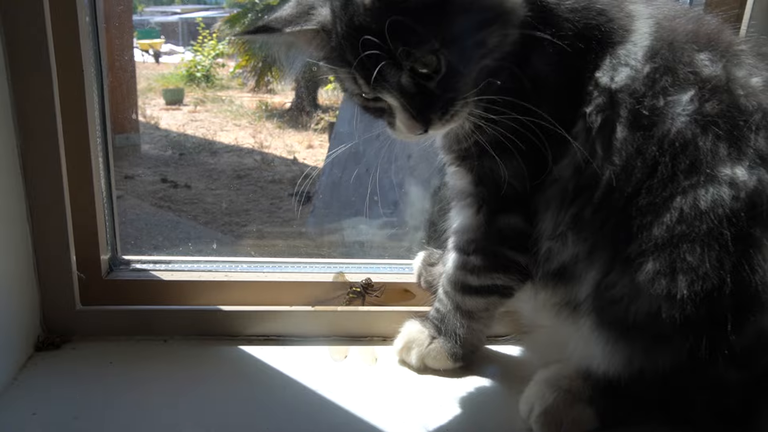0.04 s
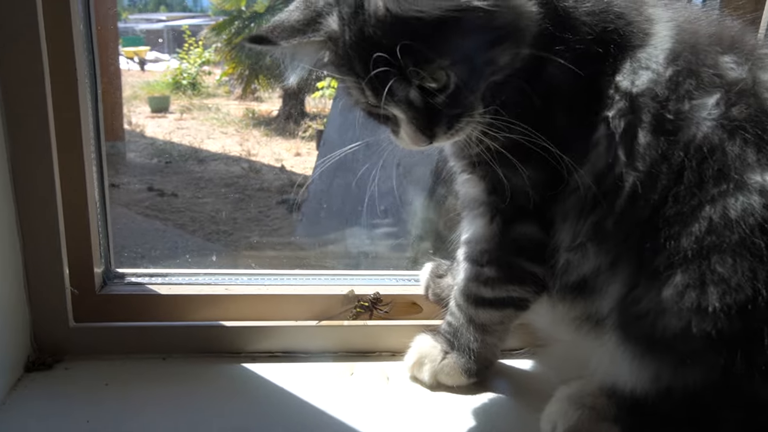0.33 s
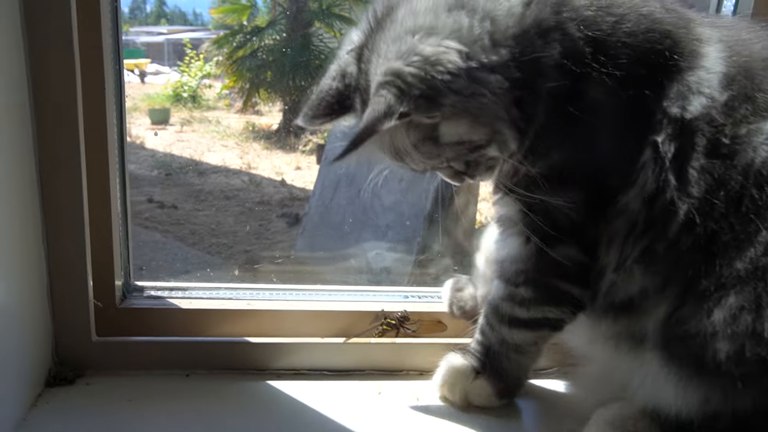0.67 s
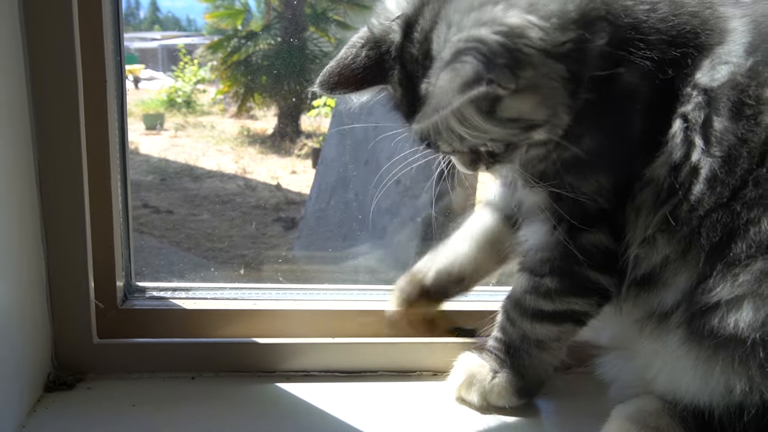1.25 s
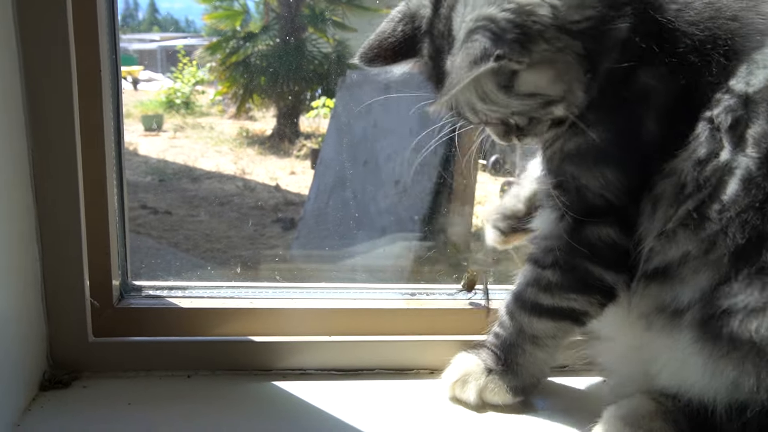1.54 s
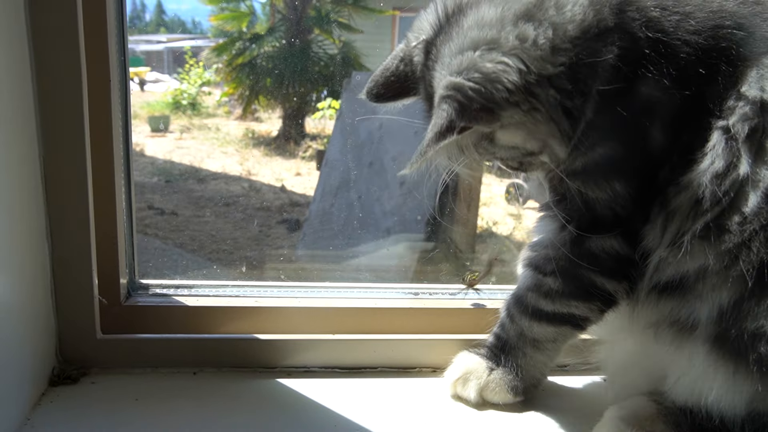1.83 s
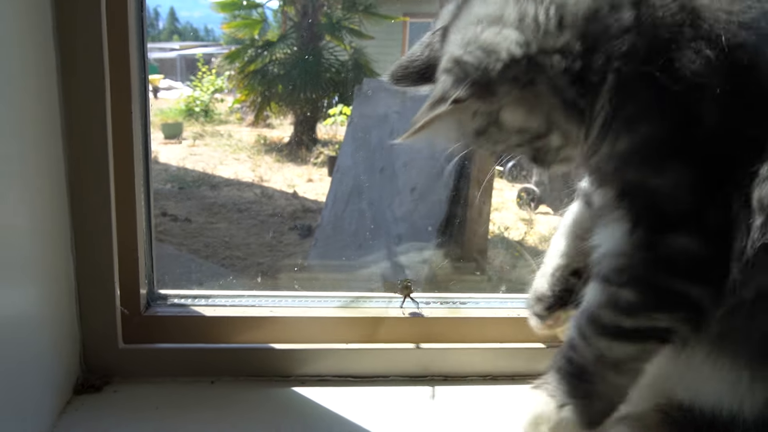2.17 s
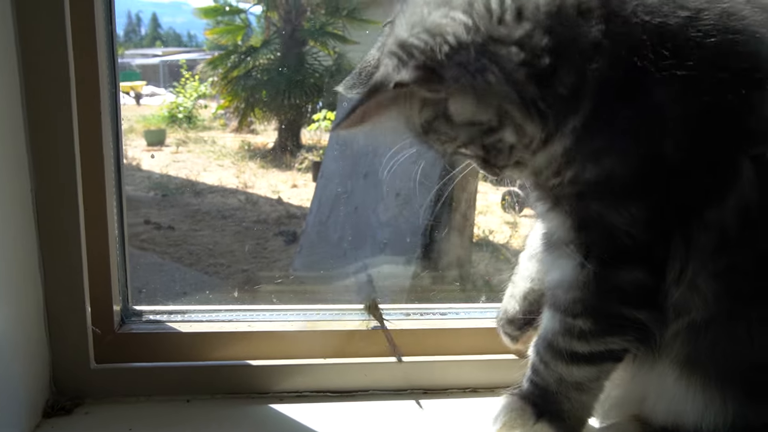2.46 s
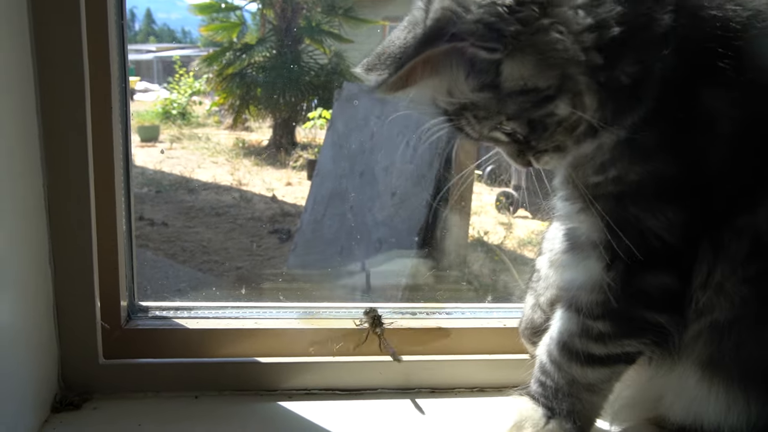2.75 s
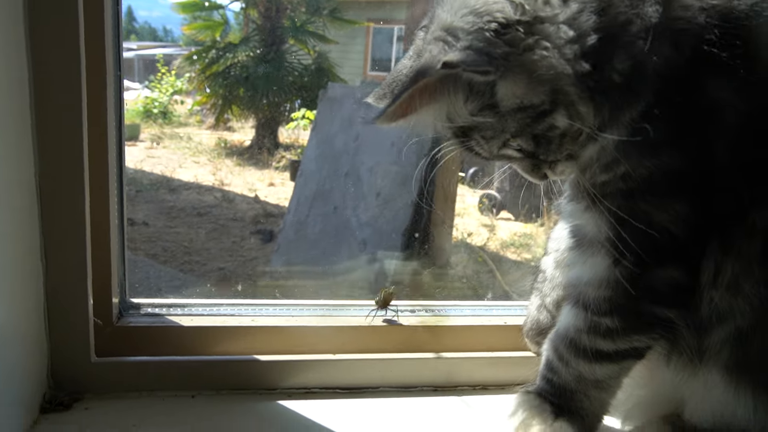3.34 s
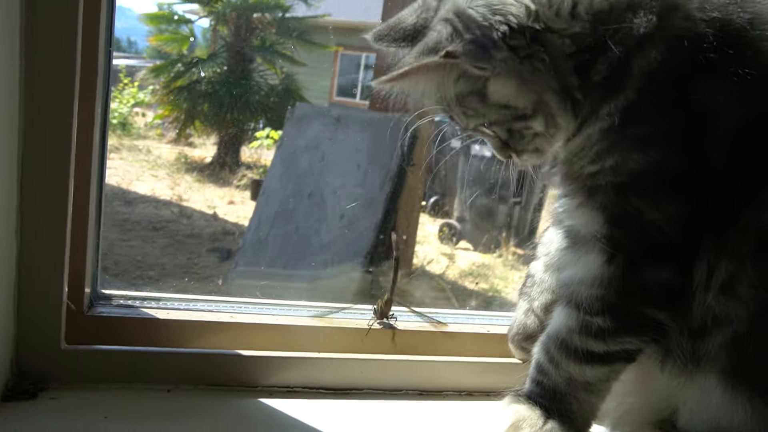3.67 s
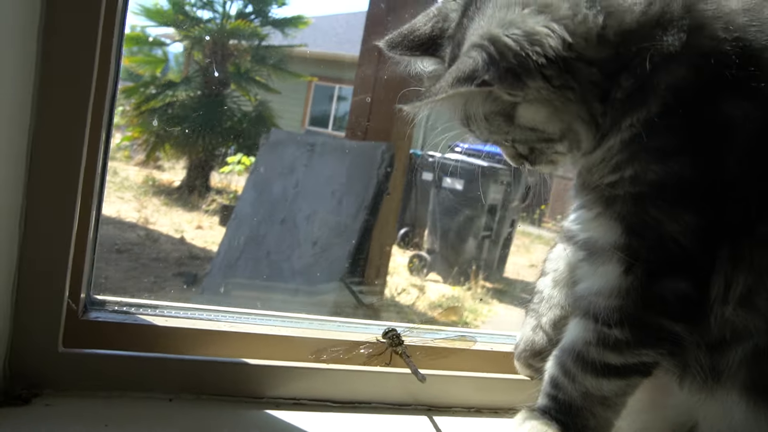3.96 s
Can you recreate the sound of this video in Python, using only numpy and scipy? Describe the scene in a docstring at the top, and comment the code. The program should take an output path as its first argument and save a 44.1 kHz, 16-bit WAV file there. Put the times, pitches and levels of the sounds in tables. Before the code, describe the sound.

Insect wings rattle on a window pane indoors, heard up close. At first there is only a kitten's quiet purr and small scratches; then sharp, papery fluttering comes in bursts, ending with a few soft paw knocks.

```python
"""A dragonfly beats its dry wings against a window pane in bouts. Each stroke snaps on the glass,
and between the snaps the wings crackle along the frame. Close by, a kitten purrs in quick throat
pulses and paws at the insect on the sill. The window recess adds short echoes. Behind it all the
room rumbles, hums and hisses faintly, and a thin whistle comes and goes."""
import sys
import numpy as np
from scipy import signal
from scipy.fft import rfft, irfft, next_fast_len
from scipy.io import wavfile
from scipy.ndimage import map_coordinates

SR = 44100
rng = np.random.default_rng(int(sys.argv[2]) if len(sys.argv) > 2 else 0)


def to_wav(sig):
    """Store sig (one row per channel, or 1-D mono) as 16-bit WAV at the path in sys.argv[1].

    Samples outside -1..1 are clipped; the rate is SR.
    """
    pcm = np.clip(np.atleast_2d(sig), -1, 1) * 32767
    pcm = np.round(pcm).astype(np.int16)
    wavfile.write(sys.argv[1], SR, pcm.T)  # frames by channels


N = 176400

# Levels in the tables are relative. A fade is the time a sound takes to drop by 60 dB.
# Tone of each sound, from low to high: pitch_hz, level_db
RUMBLE_TONE = [(20, -10), (70, -3), (220, -6), (4000, -50.5)]
HISS_TONE = [(100, -7), (600, 6), (3000, -3.5), (16000, -15)]
CHEST_TONE = [(20, -11), (62, -1), (110, -18.5), (2000, -110)]
THROAT_TONE = [(30, -18.5), (110, -8), (170, -1), (245, 4), (330, -5), (430, -18), (1200, -64),
               (5000, -110)]
RASP_TONE = [(150, -26.5), (380, 4), (780, -5.5), (1100, -18.5), (5000, -55)]
TICK_TONE = [(500, -18), (2000, 15.5), (5300, 10.5), (16000, 7.5)]
SCRAPE_TONE = [(200, -6), (600, 3.5), (1050, -0.5), (2200, 5), (4000, -3.5), (16000, -44)]
CRACKLE_TONE = [(600, -18), (2000, -8.5), (5300, 0.5), (9800, -2.5), (15800, -2.5)]
CLACK_TONE = [(300, -25), (1000, -8.5), (2200, 11.5), (3500, -1.5), (5200, 9.5), (8000, -3), (16000, 14.5)]
SNAP_TONE = [(500, -64), (2000, -20), (4500, -5), (6000, -1.5), (8000, 0.5), (9900, 3.5), (10600, -3.5),
             (11800, 3), (14200, 0.5), (15600, -4)]
# Stretches of purring: start_s, end_s, cycles_per_s, second_pulse_db
PURR_PHRASES = [(.0595, .75, 31.25, -2), (.8015, 1.45, 28.4, -6), (1.475, 2.13, 24.9, -3),
                (2.266, 2.8, 21.5, -9), (2.886, 3.3, 22.7, -6), (3.333, 3.43, 26, -3),
                (3.494, 3.95, 21.6, -6)]
# How hard the kitten purrs: time_s, level_db
PURR_EFFORT = [(.06, -43), (.36, -51), (.43, -43), (1.0, -39), (1.12, -42), (2.03, -42.5), (2.24, -54),
               (2.32, -39), (2.4, -54), (2.5, -42.5), (2.78, -56), (2.95, -38.5), (3.07, -46.5),
               (3.35, -41), (3.64, -42), (3.95, -49)]
# Paw knocks and claw taps: start_s, level_db, pitch_hz, fade_s, width_octaves
PAW_KNOCKS = [(0.636, -45.5, 1110, .045, 0.25), (.737, -51.5, 1230, .09, .08),
              (.759, -52.5, 3170, 0.09, .06), (1.2534, -28, 1660, 0.032, 0.64),
              (2.808, -39, 425, 0.059, 0.38), (3.708, -31, 183, 0.13, .3), (3.732, -37.5, 1460, 0.13, 0.66),
              (3.85, -36.5, 450, .08, 0.66), (3.978, -29.5, 930, 0.044, 0.38)]
# Ticks of legs and claws: start_s, level_db
LEG_TICKS = [(.452, -30.5), (0.556, -32), (.759, -31), (.888, -23.5), (0.907, -25), (2.406, -20.5),
             (2.792, -31), (3.848, -25)]
# Notes the glass rings at: pitch_hz, level_db, fade_s
GLASS_NOTES = [(1318, -31.5, 0.031), (1880, -38.5, 0.018), (2905, -29.5, 0.0053)]
# Wings brushing the frame: start_s, end_s, crackle_db, scrape_db
BRUSH_BOUTS = [(1.219, 1.338, -41.5, -47), (1.33, 1.37, -37.5, -43), (1.428, 1.687, -37.5, -45),
               (1.658, 1.964, -34.5, -42), (2.157, 2.329, -35.5, -47.5), (2.485, 2.572, -31, -39),
               (2.584, 2.651, -33, -44), (2.857, 3.023, -35.5, -44.5), (3.106, 3.162, -35, -46.5),
               (3.312, 3.69, -35.5, -46), (3.698, 3.789, -48.5, -42.5)]
# Wings hitting the glass: start_s, level_db
WING_HITS = [(1.3383, -4.5), (1.3744, 1.0), (1.4003, -1.0), (1.503, 0.5), (1.5274, 0.0), (1.5557, -3.0),
             (1.5794, -4.5), (1.6034, -2.0), (1.6526, -2.5), (1.6793, -5.0), (1.7059, -3.5), (1.7301, 1.0),
             (1.7584, 1.5), (1.7878, -3.5), (1.8159, 0.0), (1.8459, -4.5), (1.8739, -4.0), (1.8996, -3.5),
             (1.9278, -3.5), (1.9518, -1.0), (1.9778, -1.0), (2.0136, -11.5), (2.0793, -12.5),
             (2.1117, 0.0), (2.1429, 1.0), (2.1647, -2.0), (2.1933, 2.5), (2.2208, -1.0), (2.2472, -0.5),
             (2.2744, 0.0), (2.3014, -4.0), (2.3334, -2.5), (2.4536, -5.0), (2.4893, -4.0), (2.5173, -2.0),
             (2.5468, -1.5), (2.5684, 0.0), (2.5975, -5.0), (2.6147, -3.0), (2.6396, -3.0), (2.6663, -5.5),
             (2.8615, -4.0), (2.8876, -1.5), (2.9103, -6.0), (2.9334, -3.5), (2.9567, 0.5), (2.9916, -2.0),
             (3.0127, -2.0), (3.0414, -8.0), (3.0667, -6.5), (3.0938, -9.0), (3.1227, -4.5), (3.1436, -8.0),
             (3.3179, -11.5), (3.3444, -7.5), (3.3673, -1.5), (3.3901, -2.0), (3.4165, 1.0), (3.4298, -2.0),
             (3.4381, 0.0), (3.4828, -3.5), (3.5224, -5.5), (3.5461, -3.5), (3.5763, -5.5), (3.6032, -3.0),
             (3.6306, -2.5), (3.6565, -4.0), (3.6863, -4.0), (3.721, -12.0)]

STEREO_SPREAD = 0.29  # how unlike the two ears are


def amp(db):
    """Turn decibels into a gain."""
    return 10 ** (np.asarray(db) / 20)


def unit(x):
    """Scale to an average power of 1."""
    return x / np.sqrt(np.mean(x ** 2) + 1e-20)


def with_tone(x, tone):
    """Filter x to follow a tone table; the filter has energy 1 and never rings ahead of a hit."""
    size = 8192
    hz, db = np.transpose(tone)
    curve_db = np.interp(np.log(np.fft.rfftfreq(size, 1 / SR) + 1), np.log(hz), db)
    cepstrum = irfft(np.log(amp(curve_db)))
    cepstrum[1:size // 2] *= 2
    cepstrum[size // 2 + 1:] = 0
    ring = irfft(np.exp(rfft(cepstrum)))
    return signal.fftconvolve(np.atleast_2d(x), ring[None] / np.linalg.norm(ring), axes=1)[:, :N]


def add(track, start_s, x):
    """Mix x into the track."""
    i = max(0, round(start_s * SR))
    part = track[..., i:i + x.shape[-1]]
    part += x[..., :part.shape[-1]]


def burst(fade_s, rise_s, spread=STEREO_SPREAD):
    """A dying puff of noise, with energy 1 in each ear."""
    t = np.arange(int((fade_s + 4 * rise_s) * SR) + 8) / SR
    noise = rng.standard_normal((3, SR // 2))[:, :len(t)]
    t = t[:noise.shape[1]]
    x = (noise[0] + spread * noise[1:]) * amp(-60 * t / fade_s) * (1 - np.exp(-(t / rise_s) ** 2))
    return x / np.linalg.norm(x, axis=1, keepdims=True)


def grains(per_s, spread_db):
    """Tiny random contacts of uneven size."""
    sizes = amp(spread_db * np.minimum(rng.exponential(size=N), 3.5)) * rng.choice([-1, 1], N)
    touches = rng.random(N) < per_s / SR
    return unit(touches * sizes * (1 + STEREO_SPREAD * rng.standard_normal((2, N))))


def flicker(depth_db, per_s):
    """A gain that wanders smoothly at random."""
    return amp(depth_db * map_coordinates(rng.standard_normal(N // 20), [np.arange(N) / SR * per_s]))


def room_noise():
    """Low rumble and mains hum, alike in both ears, and a thin hiss."""
    hum = amp(-47.5) * np.sin(2 * np.pi * 60.36 * np.arange(N) / SR)
    rumble = amp(-45) * with_tone(rng.standard_normal(N), RUMBLE_TONE)
    hiss = amp(-56.5) * with_tone(rng.standard_normal((2, N)), HISS_TONE)
    return hum + rumble + hiss


def whistle(start_s=0.28, end_s=1.7, pitch_hz=2310, width_hz=150):
    """A thin, airy whistle swells, falters and fades."""
    t, hz = np.arange(N) / SR, np.fft.rfftfreq(N, 1 / SR)
    air = irfft(rfft(rng.standard_normal(N)) / (1 + (2 * (hz - pitch_hz) / width_hz) ** 2), N)
    swell = np.abs(np.sin(np.interp(t, [start_s, end_s], [0, np.pi]))) ** 0.5
    return amp(-64.5) * unit(air * flicker(depth_db=2, per_s=20)) * swell


def echo(x, fade_s, rise_s):
    """Blurred echoes, drawn afresh every tenth of a second."""
    out, size = np.zeros((2, N)), SR // 10
    for i in range(0, N, size):
        add(out, i / SR, signal.fftconvolve(x[:, i:i + size], burst(fade_s, rise_s, spread=1.1), axes=1))
    return out


def purr(gap_s=0.01092, jitter_s=0.0002, scatter_db=1.7, rasp_fade_s=0.022):
    """Each cycle is a chest thump and two throat pulses, with puffs of rasp that grow with effort."""
    first, second = np.zeros((2, N))
    for start, end, rate, second_db in PURR_PHRASES:
        for s in np.arange(start, end, 1 / rate):
            late_s, size_db = rng.standard_normal((2, 2)) * [[jitter_s], [scatter_db]]
            add(first, s + late_s[0], amp(size_db[:1]))
            add(second, s + gap_s + late_s[1], amp(size_db[1:] + second_db))
    t, pulses = np.arange(N) / SR, first + second
    effort_db = np.interp(t, *np.transpose(PURR_EFFORT))
    puffs = signal.fftconvolve(pulses, amp(-60 * t / rasp_fade_s))[:N] * rng.standard_normal(N)
    rasp = amp(-10 + 0.3 * (effort_db - effort_db.mean())) * unit(with_tone(puffs, RASP_TONE))
    throat = amp(effort_db - 1) * (unit(with_tone(pulses, THROAT_TONE)) + rasp)
    chest = amp(-49.5) * unit(with_tone(first, CHEST_TONE))
    return throat + chest


def paw_knocks(rise_s=0.00021):
    """Soft blows of a paw or claw, each ringing briefly around one pitch."""
    x, t = np.zeros(N), np.arange(SR // 4) / SR
    hz = np.fft.rfftfreq(len(t), 1 / SR) + 1
    for s, db, pitch_hz, fade_s, width in PAW_KNOCKS:
        band = np.exp(-np.abs(np.log2(hz / pitch_hz)) / width)
        shape = amp(-60 * t / fade_s) * (1 - np.exp(-t / rise_s))
        ring = irfft(rfft(rng.standard_normal(len(t))) * band, len(t)) * shape
        add(x, s, amp(db) * ring * np.linalg.norm(shape) / np.linalg.norm(ring))
    return x


def leg_ticks():
    """Light scratches of legs and claws."""
    x = np.zeros((2, N))
    for s, db in LEG_TICKS:
        add(x, s, amp(db + 5) * burst(fade_s=0.099, rise_s=0.00023))
    return with_tone(x, TICK_TONE)


def with_glass_ring(x):
    """The pane rings faintly under the touches in x."""
    t = np.arange(SR // 5) / SR
    ring = sum(amp(db - 6 - 60 * t / fade_s) * np.cos(2 * np.pi * hz * t)
               for hz, db, fade_s in GLASS_NOTES)
    return x + signal.fftconvolve(x, ring[None], axes=1)[:, :N]


def wing_brush(rise_s=0.0028, stop_fade_s=0.066, linger_fade_s=0.56):
    """Wings crackle and scrape on the frame: each bout starts at once, then drops to a rustle."""
    t, force = np.arange(N) / SR, np.zeros((2, N))
    for start, end, *levels_db in BRUSH_BOUTS:
        attack = np.clip((t - start) / rise_s, 0, 1)
        after = np.maximum(t - end, 0)
        release = np.maximum(amp(-60 * after / stop_fade_s), amp(-6 - 60 * after / linger_fade_s))
        force = np.maximum(force, amp(levels_db)[:, None] * attack * release)
    bright, dull = force * flicker(depth_db=2, per_s=110)
    crackle = with_tone(grains(per_s=3000, spread_db=6) * bright, CRACKLE_TONE)
    scrape = with_tone(grains(per_s=1700, spread_db=4.5) * dull, SCRAPE_TONE)
    return amp(-0.5) * crackle + amp(-1) * scrape


def wing_strokes(snap_fade_s=0.0079, clack_fade_s=0.037, rise_s=0.00034, bounce_within_s=0.011):
    """Each stroke hits the glass with a sharp snap, a longer clack and two small bounces."""
    snaps, clacks = np.zeros((2, 2, N))
    for s, db in WING_HITS:
        left_right = amp(rng.normal() * np.array([[4], [-4]]))
        add(snaps, s, amp(db) * left_right * burst(snap_fade_s, rise_s))
        add(clacks, s, amp(db - 5 + 2 * rng.normal()) * burst(clack_fade_s, rise_s))
        for _ in range(2):
            bounce_gain = amp(db - 16.5) * rng.random()
            bounce_s = s + bounce_within_s * rng.uniform(0.12, 1)
            add(snaps, bounce_s, bounce_gain * burst(snap_fade_s / 2, rise_s / 2))
    return with_tone(snaps, SNAP_TONE) + with_tone(clacks, CLACK_TONE)


def scene():
    """The dragonfly and the kitten in the window recess, with the room behind."""
    insect = with_glass_ring(wing_strokes() + wing_brush() + leg_ticks())
    contacts = insect * amp([[-0.5], [0.5]]) + paw_knocks()  # the insect is slightly to the right
    recess = amp(-6.5) * echo(contacts, fade_s=0.018, rise_s=0.00084)
    room = amp(-16) * echo(contacts, fade_s=0.092, rise_s=0.0087)
    return contacts + recess + room + purr() + whistle() + room_noise()


def record(dry):
    """Cut away the very highest treble."""
    top_hz, size = 16000, next_fast_len(N + SR // 2)
    return irfft(rfft(dry, size) * (np.fft.rfftfreq(size, 1 / SR) < top_hz), size)[:, :N]


dry = scene()
out = record(dry)
to_wav(out)
```